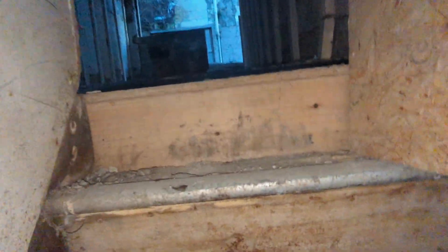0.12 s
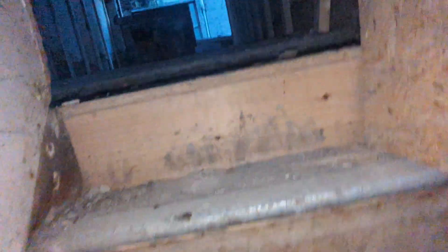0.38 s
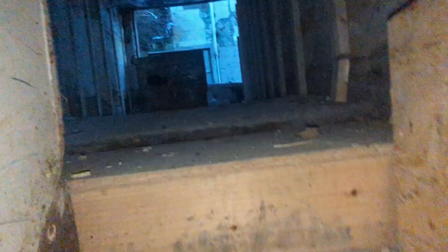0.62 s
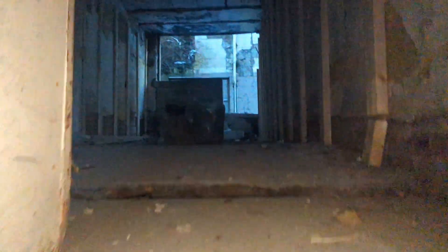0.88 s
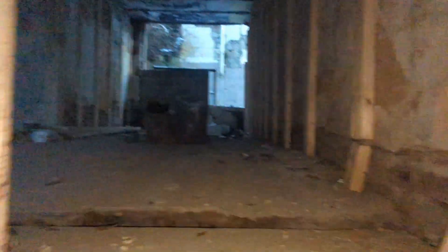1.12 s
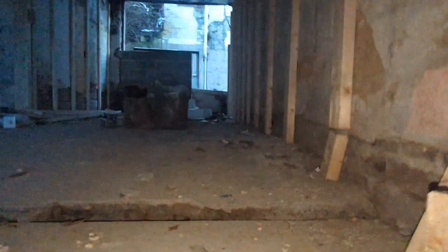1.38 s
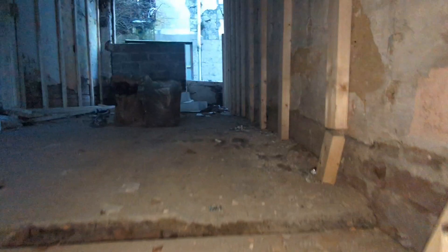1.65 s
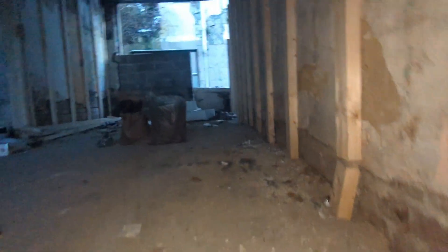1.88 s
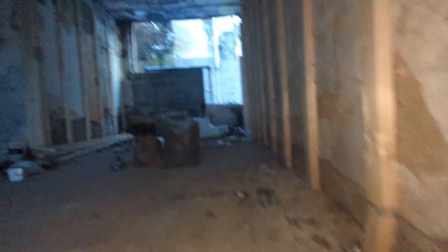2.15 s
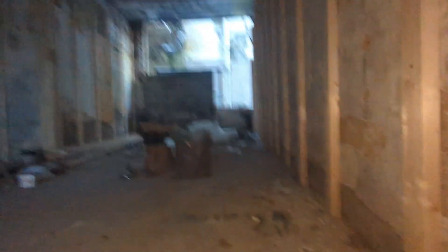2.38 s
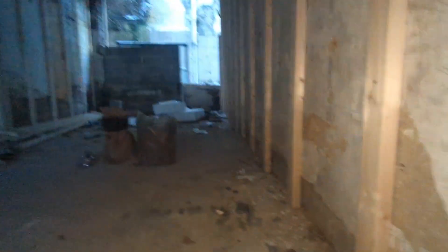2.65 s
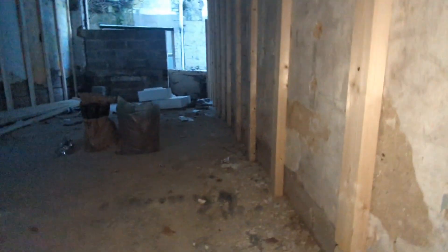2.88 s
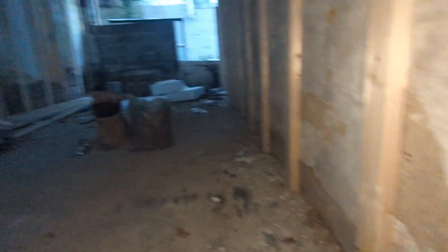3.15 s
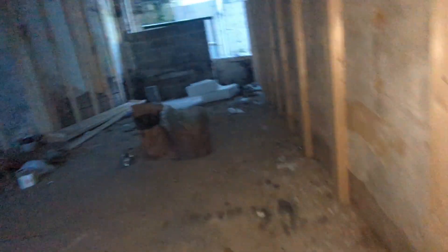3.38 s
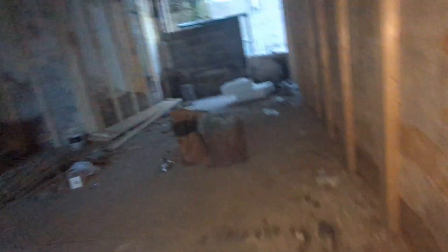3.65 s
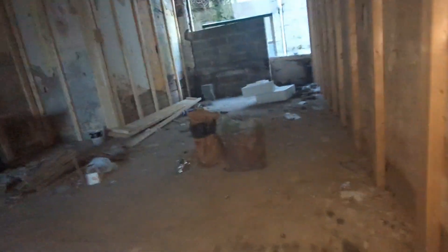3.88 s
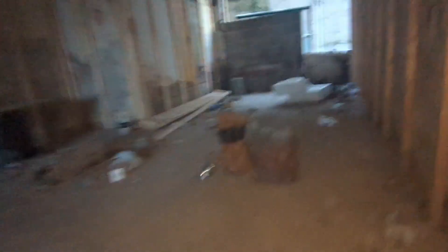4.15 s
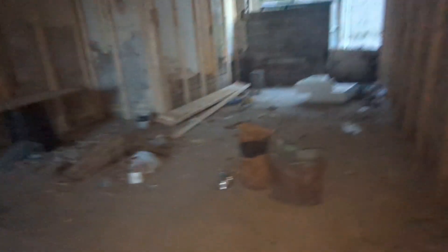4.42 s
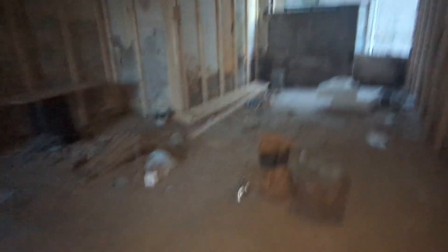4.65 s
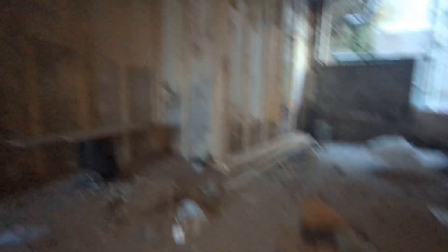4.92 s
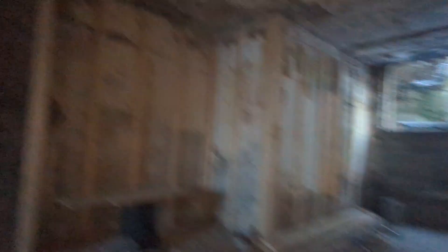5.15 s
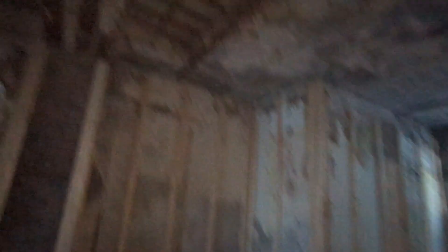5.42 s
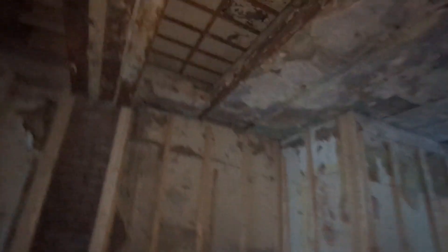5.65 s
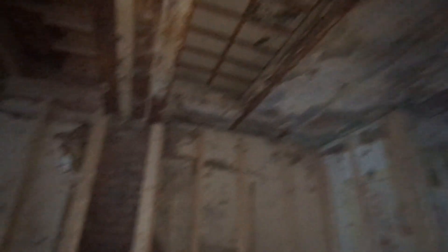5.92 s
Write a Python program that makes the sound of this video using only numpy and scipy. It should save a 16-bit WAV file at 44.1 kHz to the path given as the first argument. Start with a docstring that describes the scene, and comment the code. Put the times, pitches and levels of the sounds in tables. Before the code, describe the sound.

A handheld stereo microphone is carried by someone in heavy boots, climbing the last wooden stairs into a bare, dusty, empty building. At 0.1 s a low thump with a hard clack lands, bouncing lightly, while the floor creaks; grit rasps twice under a dragged sole at about 0.35 and 0.43 s. Another solid step hits at 0.73 s, a softer one at 1.5 s, with small gritty ticks between. Weak contacts follow at 2.3-2.4 s. A heavy double thud booms at 2.95 s, a tiny squeak comes at 3.25 s, and a hard, woody clack at 3.4 s. Duller thumps fall at 3.9 s, then a loud cloth brush at 4.0 s. Close clothing hisses and snaps throughout. Afterwards steps thin to almost nothing; rustle fades over soft creaks, low distant rumble and steady air until 6 s, with one faint tick near 5.95 s.

```python
"""Heavy boots climb the last wooden stairs of an empty building and cross a bare, dusty floor.
From the start each tread is a soft thump with a harder knock, and boards and room boom after it; cloth
hisses and snaps close to two microphone ports, and grit rasps twice under a dragged sole in the first
half second. Short rings make the ticks and clacks, and a squeak after three seconds. After four seconds
the thumps thin out; rustle, creaking floor, rumble and air, all shaped noise, carry on to the end."""
import sys
import numpy as np
from scipy import signal
from scipy.fft import rfft, irfft, next_fast_len
from scipy.io import wavfile
from scipy.ndimage import uniform_filter1d, map_coordinates

SR = 44100
rng = np.random.default_rng(int(sys.argv[2]) if len(sys.argv) > 2 else 0)


def master(y):
    """Save y as 16-bit WAV."""
    cut = np.clip(np.atleast_2d(y).T, -1, 1)
    pcm = np.round(cut * 32767)  # scale
    wavfile.write(sys.argv[1], SR, pcm.astype(np.int16))


def field_ratio(decibels):
    """Amplitude ratio for a level in dB (20 dB per decade); scalars and array-likes work."""
    return 10 ** (np.asarray(decibels, dtype=float) / 20)


N = 266055  # length of the scene [samples]


def unit(x):
    """Scales a sound to an rms of 1."""
    return x / np.sqrt(np.mean(x ** 2) + 1e-20)


def along(points, hz):
    """Reads (frequency, value) points as a curve over a logarithmic frequency axis."""
    point_hz, value = np.transpose(points)
    return np.interp(np.log(hz + 1), np.log(point_hz + 1), value)


def wobble(rate):
    """A smooth random curve through `rate` random points a second."""
    points = rng.standard_normal(int(N * rate / SR) + 4)
    return map_coordinates(points, [np.arange(N) * rate / SR])


def swell(peak_s, rise_s, fall_s, db):
    """A gain that climbs to its peak and falls away; rise and fall are seconds per 10 dB."""
    t = np.arange(N) / SR - peak_s
    return field_ratio(db + 10 * np.minimum(t / rise_s, -t / fall_s))


def filtered(x, response):
    """Multiplies the spectrum of x by a response, which may also shift phase."""
    size = next_fast_len(x.shape[-1] + SR // 2)
    spectrum = rfft(x, size) * response(np.fft.rfftfreq(size, 1 / SR))
    return irfft(spectrum, size)[..., :x.shape[-1]]


# How alike left and right are: (frequency [Hz], likeness [0 to 1])
LIKENESS = [(60, 1), (125, 1), (250, 0.9), (600, 0.83), (1500, 0.17), (4000, 0.1), (14000, 0.13)]


def spread(pair, spectrum=((1, 0),)):
    """Mixes two unrelated signals into left and right: the more middle, the more alike the sides."""
    def middle_and_side(hz):
        angle = np.arccos(np.clip(along(LIKENESS, hz), -1, 1)) / 2
        return field_ratio(along(spectrum, hz)) * [np.cos(angle), np.sin(angle)]

    mid, side = filtered(pair, middle_and_side)
    return np.array([mid + side, mid - side])


# How long the room rings: (frequency [Hz], time to fade by 60 dB [s])
ROOM_FADE = [(40, 1.05), (110, 0.74), (280, 0.83), (740, 0.62), (2000, 1.05), (10000, 0.47)]


def tail():
    """A fresh room answer: dense echoes of near walls die fast, then each pitch fades at its own speed."""
    hz, t, z = signal.stft(spread(rng.standard_normal((2, SR))), SR, nperseg=1024)
    fading = z * field_ratio(-60 * t / along(ROOM_FADE, hz)[:, None])
    echoes = signal.istft(fading, SR, nperseg=1024)[1][:, :SR]
    t = np.arange(SR) / SR
    arrival = np.clip((t - .005) / 0.0033, 0, 1)
    near_walls = 1 + 3.4 * field_ratio(-60 * t / 0.077)
    return arrival * near_walls * echoes / np.std(echoes[0, :SR // 20]) / np.sqrt(SR / 20)


# The walker's weight shifting on the floor: (time [s], creak level [dB])
WEIGHT_SHIFTS = [(0, -30), (.1, -38), (.34, -48), (.69, -60), (.93, -47), (1.4, -60), (1.66, -52),
                 (2.15, -59), (2.47, -51), (2.9, -60), (3.15, -47), (3.44, -46), (3.93, -57), (4.2, -46),
                 (4.47, -54), (4.72, -49), (5.05, -53), (5.4, -55), (5.7, -55), (6.03, -56)]
# Colour of the low rumble and groan: (frequency [Hz], relative level [dB])
RUMBLE_COLOUR = [(18, -44), (30, 3), (129, -5.5), (143, -5), (156, -44), (177, -7.5), (220, -10.5),
                 (290, -49), (480, -120)]
# Colour of the floor's creak: (frequency [Hz], relative level [dB])
CREAK_COLOUR = [(120, -34), (200, -10.5), (292, 0.5), (392, -8), (501, -5.5), (759, -10.5), (900, -11.5),
                (1170, -32), (1980, -120)]
# Colour of the air noise: (frequency [Hz], relative level [dB])
AIR_COLOUR = [(350, -26), (600, -15), (950, -9), (1400, -9), (2000, -9.5), (2800, -19), (6500, -23.5),
              (15900, -41)]


def background():
    """Coloured noise: floor creaks and groans under shifting weight, over distant traffic and steady air."""
    groan_over_creak_db, traffic_db, air_db = 5, -51.5, -56

    def noise(colour):
        return unit(spread(rng.standard_normal((2, N)), colour))

    weight_db = np.interp(np.arange(N) / SR, *np.transpose(WEIGHT_SHIFTS))
    # traffic and groan share one noise, so their powers add
    low_gain = np.hypot(field_ratio(traffic_db), field_ratio(weight_db + groan_over_creak_db))
    rumble = low_gain * field_ratio(1.6 * wobble(3.83)) * noise(RUMBLE_COLOUR)
    creak = field_ratio(weight_db + 1.7 * wobble(18)) * noise(CREAK_COLOUR)
    return rumble + creak + field_ratio(air_db) * noise(AIR_COLOUR)


def rub(spectrum, clump_db, burst_db, rate, t60, spike):
    """Friction noise of rms 1: slow clumps, sudden catches that die away, and single spiky slips."""
    grains = rng.standard_normal((2, N)) * field_ratio(spike * rng.exponential(size=N))
    catches = (rng.random(N) < rate / SR) * rng.uniform(0.067, 1.59, N)  # about `rate` a second
    dying = signal.lfilter([1], [1, -field_ratio(-60 / (t60 * SR))], catches)
    bursts = 1 + field_ratio(burst_db) * uniform_filter1d(dying, size=SR // 400)  # builds over a few ms
    return unit(spread(field_ratio(clump_db * wobble(12)) * bursts * grains, spectrum))


# Strokes of cloth and soles: (peak time [s], rise [s per 10 dB], fall [s per 10 dB],
# hiss level [dB], scrape against hiss [dB, before the scrape's overall gain])
STROKES_OF_CLOTH = [(0.001, 0.05, 0.098, -40.0, 1.0), (0.131, 0.109, 0.253, -47.0, 0),
                    (0.32, 0.051, 0.081, -35.5, -12), (0.436, 0.061, 0.03, -36.5, -9.0),
                    (0.63, 0.484, 0.091, -39.5, -13), (0.756, 0.24, 0.013, -40.5, -10.0),
                    (0.859, 0.05, 0.083, -42.0, -6.5), (0.975, 0.063, 0.209, -46.5, -1.0),
                    (1.014, 0.014, 0.027, -40.0, -8), (1.219, 0.147, 0.096, -46.0, -5.0),
                    (1.343, 0.084, 0.048, -41.5, -18.5), (1.493, 0.013, 0.051, -41.0, -14.0),
                    (1.572, 0.079, 0.035, -35.5, -7), (1.69, 0.357, 0.072, -41.5, -13.0),
                    (1.803, 0.046, 0.045, -50.5, -3.5), (1.867, 0.112, 0.026, -48.0, -10.5),
                    (1.942, 0.019, 0.029, -53.5, 0.5), (2.034, 0.028, 0.048, -38.0, -8.5),
                    (2.095, 0.053, 0.007, -43.5, -9.0), (2.372, 0.12, 0.292, -48.0, -5.5),
                    (2.452, 0.047, 0.035, -48.5, -10.0), (2.491, 0.044, 0.132, -47.5, -9.0),
                    (2.641, 0.061, 0.025, -43.5, -17.0), (2.724, 0.008, 0.137, -45.5, -15.0),
                    (2.881, 0.012, 0.015, -49.0, -12.5), (2.921, 0.023, 0.041, -46.5, -10.0),
                    (3.045, 0.112, 0.128, -45.5, -5.5), (3.201, 0.014, 0.33, -48.0, -3.0),
                    (3.408, 0.112, 0.04, -42.0, -12), (3.559, 0.13, 0.071, -51.0, 0.5),
                    (3.71, 0.122, 0.031, -48.5, -16.5), (3.802, 0.056, 0.03, -46, -10),
                    (3.922, 0.069, 0.207, -44.5, -9.5), (4.002, 0.01, 0.12, -28.5, -10),
                    (4.129, 0.161, 0.075, -37.5, -5.0), (4.281, 0.029, 0.11, -45.5, -8.0),
                    (4.458, 0.03, 0.445, -47, -2), (4.724, 0.159, 0.185, -47.0, -14.5),
                    (4.813, 0.185, 0.047, -42.5, -14.5), (5.065, 0.057, 0.063, -49.5, -5.5),
                    (5.193, 0.065, 0.143, -42.0, -12.0), (5.475, 0.024, 0.06, -56.0, -10.5),
                    (6.034, 0.325, 0.1, -57.0, 2.5)]
# Colour of the hiss: (frequency [Hz], relative level [dB])
HISS_COLOUR = [(1500, 0.5), (2500, 11), (2800, 9), (4100, 9.5), (8200, 8), (8900, 7.5), (10800, 1.5),
               (12200, 6.5), (14600, 6), (15900, -1)]
# Colour of the scrape: (frequency [Hz], relative level [dB])
SCRAPE_COLOUR = [(350, -14), (600, -7.5), (1150, -1.5), (1320, -0.5), (1570, -1), (1700, 1.5), (2120, 0),
                 (4000, -22), (5200, -26), (8800, -120)]


def rustle():
    """Cloth and soles rub: a hiss whose finest part comes and goes, and a coarser scrape."""
    power = field_ratio(2 * -66)  # the clothes never rest fully: a -66 dB floor
    scrape_power = 0
    for peak_s, rise_s, fall_s, hiss_db, scrape_db in STROKES_OF_CLOTH:
        stroke = swell(peak_s, rise_s, fall_s, hiss_db) ** 2
        power = power + stroke
        scrape_power = scrape_power + field_ratio(2 * scrape_db) * stroke

    # fine part: -1 dB when the hiss is at -40 dB, brighter with harder rubbing, wavering
    harder_db = 10 * np.log10(power) + 40
    fine_db = -1 + .17 * harder_db + 1.7 * wobble(14)
    cloth = rub(HISS_COLOUR, clump_db=1.0, burst_db=4.5, rate=60, t60=0.021, spike=2.45)
    fine = filtered(cloth, lambda hz: 1 / (1 + (8700 / (hz + 1)) ** 12))  # above about 8700 Hz
    hiss = np.sqrt(power) * (unit(cloth - fine) + field_ratio(fine_db) * unit(fine))

    coarse = rub(SCRAPE_COLOUR, clump_db=0.8, burst_db=4.5, rate=31, t60=0.028, spike=2.68)
    return hiss + field_ratio(3.5) * np.sqrt(scrape_power) * coarse


# Creases snapping and grit cracking: (time [s], relative level [dB], tilt [dB per octave])
CREASE_SNAPS = [(0.0247, -30, -9.5), (0.1314, -34, 5), (0.5035, -29, 2), (0.5716, -21, 0), (0.6709, -28, 1),
                (0.7508, -28, 0), (0.8023, -35, 0), (0.847, -31, -0.5), (0.988, -35.5, -4),
                (1.0124, -20, 4), (1.0952, -37, -5), (1.167, -32, 2), (1.2256, -37, -3), (1.273, -35, 4),
                (1.3287, -28, 2), (1.4641, -35, -1), (1.493, -22, 1), (1.8544, -36, 0), (1.993, -31.5, 3),
                (2.0243, -32.5, -5), (2.387, -35, -1), (2.433, -35, 0), (2.4844, -23, 1.5),
                (2.5098, -36, 0), (2.723, -34, 0), (2.7753, -35, -4), (2.818, -35, 5), (2.877, -29.5, -1),
                (2.9257, -40, -13.5), (3.1955, -35, 1), (3.3374, -33, -5), (3.3982, -24.5, -5),
                (3.4715, -30, 3), (3.552, -34, -6.5), (3.6833, -36, 0), (3.7686, -33.5, -4),
                (3.8018, -31, -3), (3.957, -34, 3), (4.0036, -26, -8.5), (4.455, -33, 3), (4.4752, -37, -1),
                (4.596, -32, 3), (4.6517, -31, -3.5)]


def snaps():
    """Each snap is a short puff of treble noise, dull or bright by its tilt."""
    t60_s, onset_s = .016, .0014
    out = np.zeros((2, N + SR))
    t = np.arange(SR // 20) / SR
    envelope = field_ratio(-60 * t / t60_s) * (1 - np.exp(-t / onset_s))
    for s, db, tilt_db in CREASE_SNAPS:
        def colour(hz):
            bass_cut = (1j * hz / (1j * hz + 2500)) ** 2
            return field_ratio(tilt_db * np.log2(hz / 8000 + .1)) * bass_cut

        puff = rng.standard_normal((2, len(t))) * envelope
        out[:, round(s * SR):][:, :len(t)] += field_ratio(db + 7) * filtered(puff, colour)
    return spread(out[:, :N])


# A sole rasping over the tread's edge: (peak time [s], rise [s per 10 dB], fall [s per 10 dB],
# level before roughness [dB], centre [Hz])
RASP_STROKES = [(.345, .06, .14, -35, 1730), (.433, .021, .011, -35, 2550)]


def rasp():
    """Grit under a dragged sole: slow noise carried up to a centre pitch makes uneven narrow noise."""
    slow = filtered(rng.standard_normal((2, 2, N)), lambda hz: 1 / (1 + (hz / 330) ** 2))
    out = 0
    for peak_s, rise_s, fall_s, db, centre_hz in RASP_STROKES:
        turn = 2 * np.pi * centre_hz * np.arange(N) / SR
        narrow = slow[0] * np.cos(turn) + slow[1] * np.sin(turn)
        out = out + swell(peak_s, rise_s, fall_s, db) * unit(spread(narrow))
    return field_ratio(1.6 * wobble(69.3)) * out


# Higher modes of the boards: (frequency [Hz], relative level [dB], time to fade by 60 dB [s])
TREAD_MODES = [(344, -14, .14), (415, -15, .06), (613, -13, .057), (803, -24, .03), (1060, -11, .018),
               (1400, -18, .022), (2050, -12, .019), (2300, -17, .017), (2700, -17, .014),
               (3600, -22, .012)]
# Hard edges of the boot striking those modes: (time [s], level [dB], pitch rung best [Hz])
BOOT_CLACKS = [(.107, -5, 1700), (.734, -13, 800), (2.278, -22, 900), (2.927, -15, 1700),
               (2.964, -21, 1500), (3.403, 1.5, 650), (5.956, -24, 1200)]
# Small pitched ticks of grit and settling boards: (time [s], level [dB], pitch [Hz])
GRIT_TICKS = [(.834, -24.5, 382), (0.92, -27, 376), (1.040, -32, 850), (1.050, -32.5, 328),
              (1.094, -22, 3820), (1.096, -22, 1300), (1.099, -25, 1520), (1.108, -33, 373),
              (1.566, -19, 2440), (1.566, -23, 1455), (1.575, -21, 2530), (1.575, -32, 1640),
              (2.330, -38, 990), (2.444, -39, 1200), (3.223, -29, 1470), (3.957, -27.5, 1930),
              (4.128, -26, 491), (4.452, -33, 970), (4.474, -31, 1320)]
# A sole squeaking: (time [s], level [dB], pitch [Hz])
SOLE_SQUEAKS = [(3.237, -43, 3550), (3.260, -43, 3620)]


def ticks():
    """Clacks, ticks and squeaks are short, slightly rough rings with a faint echo from the walls."""
    tick_cycles, squeak_cycles = 37, 300  # vibrations until 60 dB down
    rings = []  # (time [s], level [dB], pitch [Hz], time to fade by 60 dB [s])
    for s, db, best_hz in BOOT_CLACKS:
        for hz, mode_db, t60_s in TREAD_MODES:
            off_centre_db = 3.5 * np.log2(hz / best_hz) ** 2  # 3.5 dB lost one octave away
            rings.append((s, db + mode_db - off_centre_db, hz, t60_s))
    rings += [(s, db, hz, tick_cycles / hz) for s, db, hz in GRIT_TICKS]
    rings += [(s, db, hz, squeak_cycles / hz) for s, db, hz in SOLE_SQUEAKS]

    out = np.zeros(N + SR)
    t = np.arange(SR // 10) / SR
    onset = 1 - np.exp(-t / 0.00057)
    for s, db, hz, t60_s in rings:
        wandering_phase = np.cumsum(rng.normal(0, 0.08 * np.sqrt(hz / 1000), len(t)))
        ring = onset * np.sin(2 * np.pi * hz * t + wandering_phase)
        out[round(s * SR):][:len(t)] += field_ratio(db - 60 * t / t60_s) * ring
    echo = signal.fftconvolve(tail(), out[None], axes=1)[:, :N]
    return out[:N] + field_ratio(-12.5) * echo


def push(hz, cycles, size):
    """A smooth contact force of a few cycles, rising and fading under one rounded hump."""
    turns = np.clip(np.arange(size) * hz / SR, 0, cycles)
    hump = np.abs(np.sin(np.pi * (turns / cycles) ** 0.58)) ** 2.06
    return -np.sin(2 * np.pi * turns) * hump


# Board and room modes that every contact rings: (frequency [Hz], width [Hz], relative level [dB])
BOARD_MODES = [(59.7, 13, -4), (92, 7.3, -2.5), (128, 3.3, -15.5), (174.3, 7.3, 0), (240, 8.2, -12),
               (336.3, 8.3, 0), (415, 30, -9), (593, 70, 3)]


def boards(hz):
    """Resonances of floor and room, in alternating sign, over a flat share."""
    response = .5
    for k, (centre, width, db) in enumerate(BOARD_MODES):
        damping = 1j * hz * width
        response = response + (-1) ** k * field_ratio(db) * damping / (centre * centre - hz * hz + damping)
    return response


# Heel, toe and bounce contacts: (time [s], relative level [dB], thump pitch [Hz],
# relative room level [dB], knock against thump [dB])
CONTACTS = [(0.013, -30.5, 92, 2.5, -7), (.104, -10.5, 101, -9.5, -5), (.150, -17.5, 111, -16, -2),
            (0.177, -27.5, 116, -8, -1), (.227, -23, 108, -6, -15), (0.576, -32, 179, -3, -7.5),
            (0.73, -9, 136, -6.5, -10), (.832, -29, 187, -12.5, 5.5), (.917, -36, 185, 1, -6),
            (1.023, -36, 163, 7.5, -2), (1.121, -35.5, 185, -5, 2), (1.515, -14.5, 134, -14.5, -10.5),
            (1.532, -21.5, 128, -13, 5.5), (1.567, -26, 138, -2.5, -22), (2.279, -31.5, 135, -1.5, -5),
            (2.443, -31, 119, -3, -12), (2.931, -35.5, 196, -16, 8), (2.9639, -2.5, 234, -14.5, -24),
            (2.985, -7.5, 149.5, -12.5, -11), (3.021, -16, 128, -7.5, -14), (3.062, -18, 154, -6, -20),
            (3.401, -11.5, 348, -5, -7), (3.46, -22, 141, -4.5, -32), (3.906, -19, 218, -7.5, -16.5),
            (3.931, -22, 192, -8, -17), (4.000, -35.5, 196, -5.5, 7), (5.050, -44, 111, 2, -5)]
# How far the boards sag under a step: (time [s], share of the weight push)
BOARD_SAG = [(0, 0.62), (1.7, 0.24), (2.2, .1), (3.6, 0.17), (3.9, 0.28)]


def steps():
    """Each contact is a soft thump with a harder knock on its front; boards and room boom after it."""
    size = SR // 25
    out = np.zeros((2, N + 2 * SR))
    for s, db, thump_hz, room_db, knock_db in CONTACTS:
        knock_hz = 155 + 1.2 * thump_hz  # the knock's pitch rises with the thump's
        blow = push(thump_hz, 2.19, size) + field_ratio(knock_db) * push(knock_hz, 2.47, size)
        weight = np.abs(push(thump_hz / 1.4, 0.44, size))  # the body's weight arriving
        sag = np.interp(s, *np.transpose(BOARD_SAG))
        echo = signal.fftconvolve(tail(), [blow + sag * weight], axes=1)
        sound = field_ratio(room_db + 8.5) * filtered(echo, boards)
        sound[:, :size] += blow  # the direct sound
        out[:, round(s * SR):][:, :sound.shape[1]] += field_ratio(db) * sound
    return out[:, :N]


def scene():
    """Steps come from straight below; cloth, grit and air reach the left port first."""
    lead_s = 0.0002687  # half as an advance on the left, half as a delay on the right

    def lead(hz):
        return np.exp(2j * np.pi * hz * np.array([[.5], [-.5]]) * lead_s)

    sideways = ticks() + rustle() + rasp() + snaps() + background()
    return steps() + filtered(sideways, lead)


def low_pass(x):
    """Removes everything above the highest recorded frequency."""
    return signal.sosfilt(signal.butter(12, 16970, fs=SR, output="sos"), x)


# Uneven shading of the two ports: (frequency [Hz], left minus right [dB])
PORT_SHADING = [(300, 0), (700, 1), (1400, -3.5), (2800, -4), (5500, -2.5), (10000, 3.5), (15000, -0.5)]


def record(dry):
    """Two ports shaded unevenly by the housing, with a bass cut near 42 Hz and a treble limit."""
    def ports(hz):
        return field_ratio(np.array([[.5], [-.5]]) * along(PORT_SHADING, hz))

    def band(hz):
        bass_cut = (-hz * hz / (42 ** 2 - hz * hz + 1.4j * hz * 42)) ** 3
        return bass_cut * np.where(hz < 15900, 1, field_ratio(-30))

    mix = filtered(dry, lambda hz: ports(hz) * band(hz))
    return low_pass(mix)


dry = scene()
out = record(dry)
master(out)
```